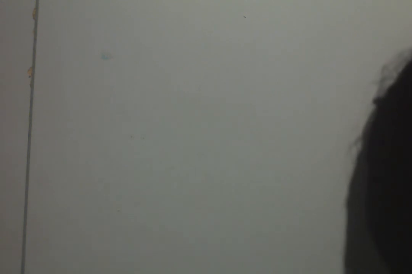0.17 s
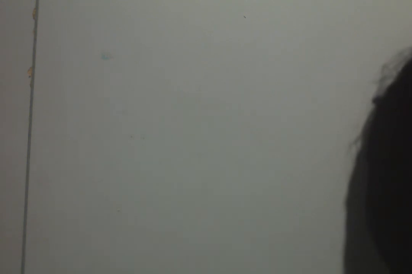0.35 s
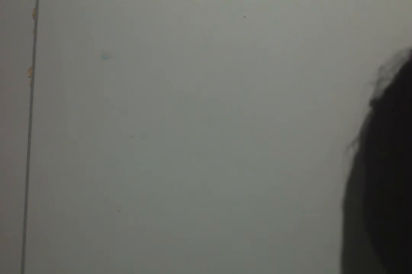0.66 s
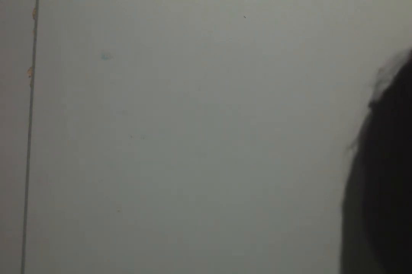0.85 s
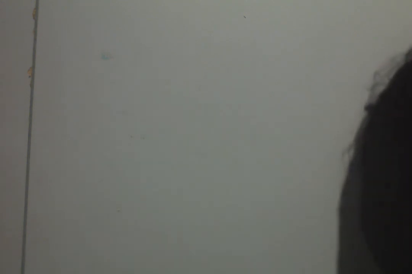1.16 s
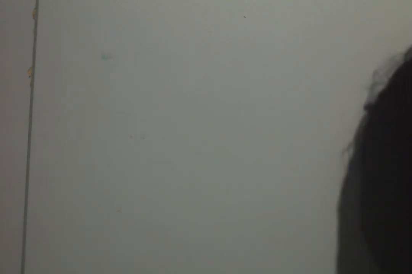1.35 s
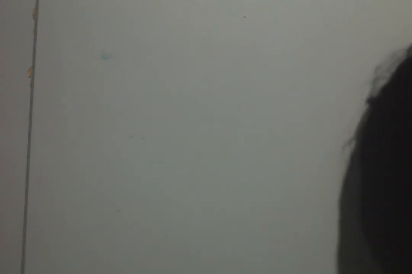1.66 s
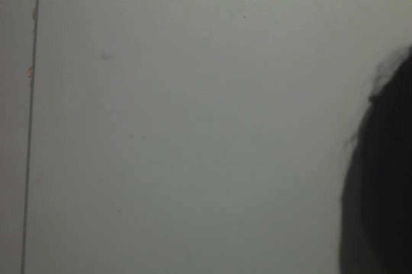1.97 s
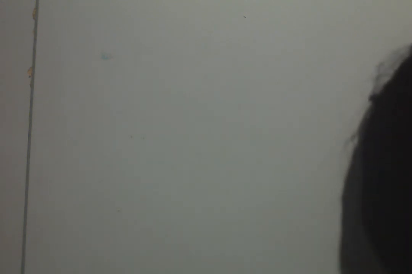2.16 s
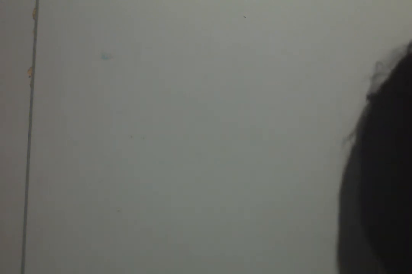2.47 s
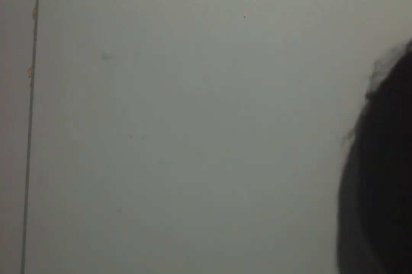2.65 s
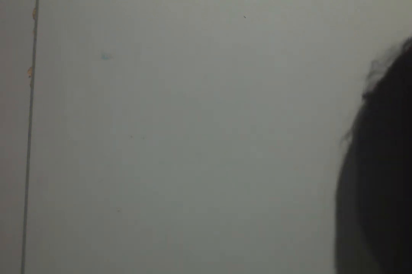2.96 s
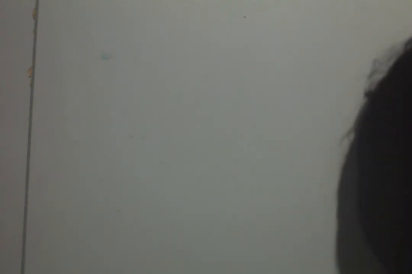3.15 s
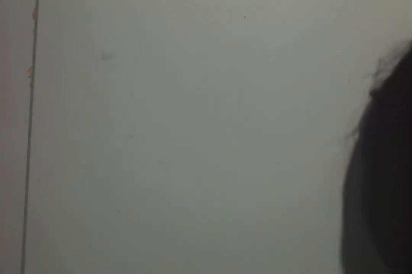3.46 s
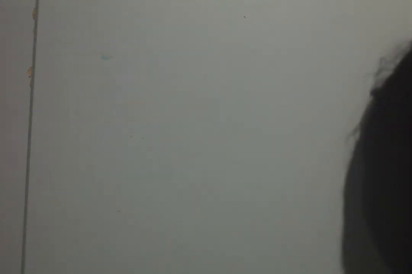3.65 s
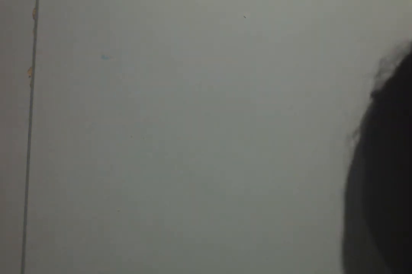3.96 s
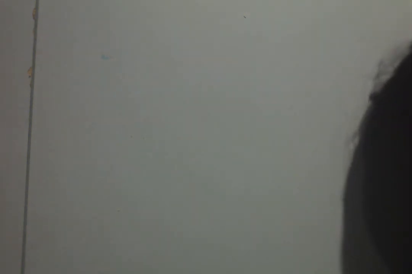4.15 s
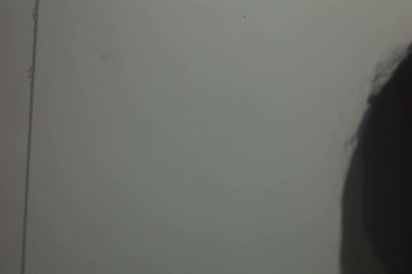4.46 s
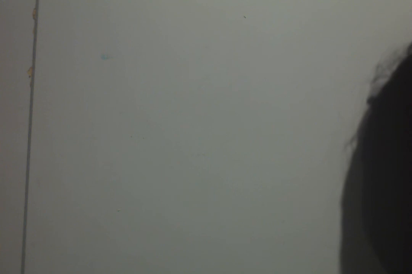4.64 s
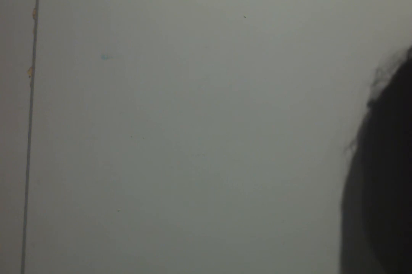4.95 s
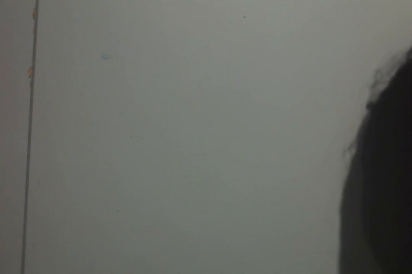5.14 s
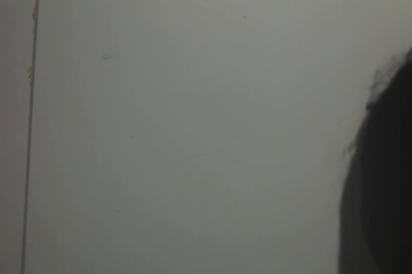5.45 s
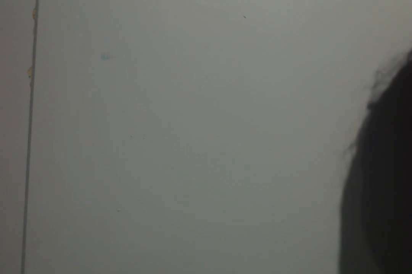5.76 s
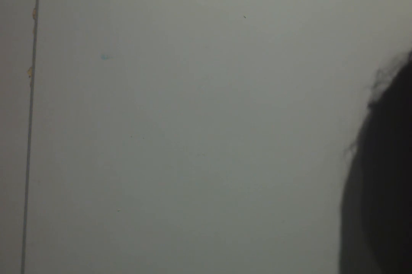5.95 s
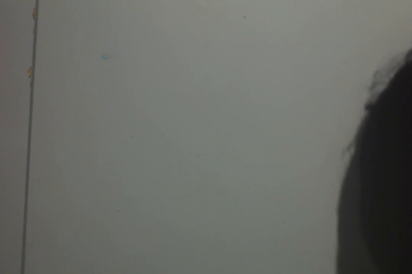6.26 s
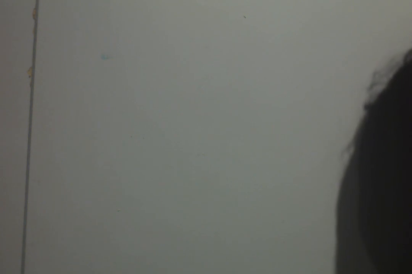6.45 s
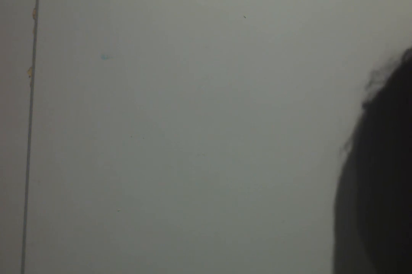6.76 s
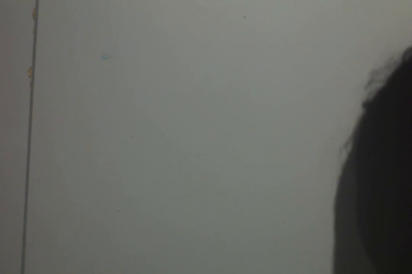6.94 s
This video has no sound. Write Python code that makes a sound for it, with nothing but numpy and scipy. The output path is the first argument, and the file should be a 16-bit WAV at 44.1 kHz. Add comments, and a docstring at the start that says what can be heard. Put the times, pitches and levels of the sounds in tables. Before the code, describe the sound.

A small room with a steady low ventilation hum, gently swelling, and very faint hiss; small hard plastic toy pieces are handled close to the microphone. Nearly quiet until 0.4 s, then a tight cluster of bright clicks at 0.58-0.67 s, with a hollow knock at 0.79. Short scraping slides follow, the strongest around 0.9-1.1 s, ending in a rattly click, then scrapes and small taps until 1.5. Firm snaps land at 1.62 and 1.76, small ticks clatter around 1.9-2.07, the loudest sharp snap comes at 2.23, a lighter click at 2.47 and another bright snap at 2.8. From 3 to 4.7 s there is mostly faint sleeve and finger rustle with tiny ticks. Light, clear pin taps come at 4.8-5.2, crisp clicks at 5.48 and, louder, 5.84, then faint ticks until 7 s. Each dry click leaves a short room tail.

```python
"""Ventilation rumble, thin hiss and faint rustle of sleeves and fingers lie under everything: coloured noise.
Over them small plastic pieces are snapped and knocked close by: micro-bounces ring plastic modes.
Slides between them are dense random slips through gliding resonators.
Later a loose pin taps a shell: micro-bounces ring a few clear modes.
The small room answers with scatter, two wall echoes and a tail."""
import sys
import numpy as np
from scipy import signal
from scipy.fft import irfft
from scipy.io import wavfile
from scipy.ndimage import uniform_filter1d

SR = 44100
rng = np.random.default_rng(int(sys.argv[2]) if len(sys.argv) > 2 else 0)


def dump(signal):
    """Clip the signal to [-1, 1] and save it as 16-bit WAV at the path in sys.argv[1]."""
    limited = np.clip(np.atleast_2d(signal).T, -1, 1)
    pcm = np.round(limited * 32767).astype(np.int16)
    wavfile.write(sys.argv[1], SR, pcm)


N = 312228


def amp(db):
    """Decibels to linear amplitude."""
    return 10 ** (np.asarray(db) / 20)


def evened(x):
    """Scales to unit RMS."""
    return x / np.sqrt(np.mean(x ** 2) + 1e-20)


def read(points, hz):
    """Interpolates a (Hz, value) curve over log frequency."""
    f, value = np.transpose(points)
    return np.interp(np.log(hz + 1), np.log(f + 1), value)


def add(mix, start_s, sound):
    """Adds a sound in place, cut at the end of the mix."""
    part = mix[round(start_s * SR):][:len(sound)]
    part += sound[:len(part)]


def level(rows):
    """Amplitude curve, straight in dB between points."""
    s, db = np.transpose(rows)
    return amp(np.interp(np.arange(N) / SR, s, db))


def noise(db_of, size, patchy_db):
    """Unit-RMS noise: random short-time spectra under a colour, with drifting patches."""
    hz = np.fft.rfftfreq(size, 1 / SR)
    real, imag, patches = rng.standard_normal((4 * N // size + 5, len(hz), 3)).T
    patches = uniform_filter1d(patches, size=9, axis=0)
    patches = evened(uniform_filter1d(patches, size=9, axis=1))
    spectra = (real + 1j * imag) * amp(db_of(hz)[:, None] + patchy_db * patches)
    return evened(signal.istft(spectra, nperseg=size, noverlap=3 * size // 4)[1][:N])


def stroke_db(t, length, rise, fall, quiet_db):
    """Attack, hold and release as straight ramps in dB; quiet_db at both ends."""
    to_start = 1 - t / max(rise, 1e-3)
    to_end = 1 - (length - t) / max(fall, 1e-3)
    return quiet_db * np.clip(np.maximum(to_start, to_end), 0, 1)


def causal(db):
    """The shortest causal (minimum-phase) pulse with a given colour."""
    log_gain = np.log(amp(np.maximum(db, -140)))
    circle = np.concatenate([log_gain, log_gain[-2:0:-1]])
    return irfft(np.exp(np.conj(signal.hilbert(circle))[:len(db)]))[:len(db)]


def resonate(x, hz, width_hz):
    """One-pole resonator on a moving pitch: shifts hz down to zero, smooths, shifts back."""
    turn = np.exp(2j * np.pi * np.cumsum(hz * np.ones(len(x))) / SR)
    r = np.exp(-np.pi * width_hz / SR)
    return 2 * (turn * signal.lfilter([1 - r], [1, -r], x / turn + 1e-18)).real


# ventilation level: (time [s], level [dB])
VENT_LEVEL = [(0.0, -55.5), (1.83, -51), (3.67, -57), (3.9, -53.5), (4.38, -58), (4.79, -53), (5.99, -55.5),
              (7.08, -61)]
# ventilation colour: (frequency [Hz], relative density [dB per Hz])
VENT_COLOUR = [(15, -83), (25, -53), (65, -32), (131, -1), (163, -15.5), (313, -23.5), (339, -31.5),
               (378, -24), (457, -37.5), (553, -32), (1090, -43), (1510, -43.5), (2900, -48.5),
               (10100, -60), (16500, -74)]
# duct and case resonances: (frequency [Hz], width [Hz], lift [dB])
VENT_MODES = [(128.8, 6.3, 2), (184.7, 13, 12), (234, 20, 8), (1530, 320, 7.5), (3423, 210, 10)]


def air():
    """Ventilation rumble swollen at a few duct and case resonances, a soft rush above."""
    def colour(hz):
        lift_db = sum(db / (1 + (2 * (hz - f) / w) ** 2) for f, w, db in VENT_MODES)
        return read(VENT_COLOUR, hz) + lift_db
    return level(VENT_LEVEL) * noise(colour, size=4096, patchy_db=2.5)


# electronics: (frequency [Hz], relative density [dB per Hz])
HISS_COLOUR = [(25, -110), (400, -31), (1000, -7.5), (2500, 1.5), (5000, 0), (8000, -12), (12000, -11.5),
               (16500, -25.5)]


def hiss(db):
    """Steady noise of the microphone electronics."""
    return amp(db) * noise(lambda hz: read(HISS_COLOUR, hz), size=1024, patchy_db=4.0)


# cloth and skin brushes: (start [s], length [s], level [dB])
BRUSHES = [(0, 0.27, -81), (0.552, 2.5, -81.5), (2.2, 0.34, -82), (2.885, 0.34, -78), (3.609, 0.26, -81),
           (3.795, .11, -82), (4.182, .22, -87), (4.469, 0.19, -81), (4.64, 0.51, -80.5),
           (5.054, 0.47, -81.5), (5.606, 0.16, -89.5), (5.856, 0.34, -83), (6.144, 0.19, -94)]
# cloth colour: (frequency [Hz], relative density [dB per Hz])
CLOTH_COLOUR = [(2940, -38.5), (5000, -8), (8360, -12.5), (10400, -8), (12100, -13), (15400, -18),
                (16500, -37)]
BRUSH_RISE, BRUSH_FALL = 0.26, 0.51  # shares of the length
BRUSH_DROP_DB, STILL_DB = -10.5, -97.5  # brush ends re hold; hands at rest


def rustle():
    """Faint hiss of sleeves and fingertips: cloth noise gated brush by brush."""
    gain = np.zeros(N)
    for start, length, db in BRUSHES:
        t = np.arange(0, length, 1 / SR)
        swell_db = stroke_db(t, length, BRUSH_RISE * length, BRUSH_FALL * length, BRUSH_DROP_DB)
        add(gain, start, amp(db + swell_db))
    return (gain + amp(STILL_DB)) * noise(lambda hz: read(CLOTH_COLOUR, hz), size=256, patchy_db=3.5)


def chatter(decay_ms, first):
    """A first contact, then a dying spray of micro-bounces."""
    u = np.arange(2049) / SR / (max(decay_ms, .1) / 1000)
    hits = (0.053 + rng.standard_normal(len(u))) * (rng.random(len(u)) < .4)
    bounces = hits * (0.56 + u) * np.exp(-u ** 1.117)
    bounces[12] = first
    return bounces


# blows, colours re the band near 5 kHz: (time [s], strength [dB], thud [dB], clack [dB], snap [dB],
#   sizzle [dB], low ring [Hz], high ring [Hz], chatter [ms])
KNOCKS = [(0.041, -51, 10, 12, 10, 15, 3900, 12400, 1.6), (0.436, -36, -10.5, -6, 4, 8, 4270, 14700, 1.8),
          (0.452, -38.5, -17, -21, -9, -1.5, 1460, 3400, 1.8),
          (0.5842, -14, -23, 4, 11, 8, 2050, 7200, 1.2), (0.5888, -26.5, -25, 0, -4, -0.5, 1510, 4600, 1.4),
          (0.596, -32, -18, -12, 10, 4, 1500, 4480, 1.5), (0.6032, -10, -7, 3.5, 13, 9, 2070, 4300, 1.8),
          (0.621, -21.5, -26, -13, 5, 4, 4000, 9000, 2), (0.6392, -29.5, -28, -3, 2, -4, 3700, 6240, 1.2),
          (0.6455, -37, -28, -7, 4, -7, 3700, 6500, 1.2), (0.6524, -32, -28, -6, 2, -6, 3600, 6000, 1.7),
          (0.6656, -16, 3.5, 9.5, -9, -17, 1900, 3550, 2.26),
          (0.758, -38.5, -10, 4, -20, -8.5, 1660, 4660, 2), (0.7755, -46, -19, -9, -17, -19, 2000, 4020, 1),
          (0.7843, -30.5, -7, -10, -17, -19, 1960, 3850, 2), (0.791, -19.5, 10, 14, 3, -9, 608, 1470, 3.9),
          (1.08, -22.5, -10, 10, 6, 6, 8200, 10700, 5), (1.0947, -20.5, -1, 7, -26, -13, 2050, 3100, 6.1),
          (1.2005, -31.5, 10, -7, -15, -38, 2200, 2980, 4.3),
          (1.2115, -34.5, 2, 7, -17, -30, 2200, 2800, 1.4), (1.294, -38, -17, 0, -14, -20, 2920, 2800, 1.9),
          (1.319, -28, -8, -4, -11, -23, 2200, 3350, 4.2),
          (1.3373, -23.5, -5.5, -2, -8.5, -33, 1260, 2200, 5.6),
          (1.357, -32, 16, 13, 0, -23, 2100, 3535, 1.3), (1.3965, -47, -5, 5, -12, -19, 2100, 3300, 1.3),
          (1.45, -32.5, 3, -14, -4, -17, 2150, 3480, 6.8),
          (1.5126, -31.5, 14, 13, -1, -7.5, 2250, 3450, 2.8),
          (1.522, -38, -8, 10, -8, -8, 2250, 3500, 0.84),
          (1.5275, -38.5, -15, -16, -4, -6, 2200, 7800, 0.99),
          (1.6163, -12.5, -0.5, 8, 8.5, 3, 408, 7480, 1.46),
          (1.7582, -16, -6, -7.5, -24, -24.5, 1410, 2260, 1.77),
          (1.7697, -23, 6, 5.5, -8, -23, 2200, 3600, 1.5), (1.847, -41.5, -8, -8, 7, -22, 6500, 7600, 1.2),
          (1.921, -30, 3, 4, -7, 9, 2200, 12380, 3.2), (1.949, -35, -14, -3, -8, 5, 3500, 7000, 1.5),
          (1.9567, -26, -18, -15, 12, -6, 6000, 7600, 2.3),
          (1.9772, -27, 3.5, 6.5, 5.5, 4, 3180, 3530, 1.7), (1.991, -43, -10, -8, 2, -5, 3300, 7200, 1.5),
          (2.0127, -36, -9, -11, 7, -5, 3480, 6100, 1.3), (2.0185, -46, -15, -15, 1, -3, 5800, 6500, 1),
          (2.0275, -36.5, -13, -5, 3, 0, 3700, 6300, 1.6), (2.069, -34, 1, 6.5, 1.5, 3, 893, 9200, 1.6),
          (2.2287, -11.5, -20, 3, -5, 7, 5400, 9260, 1.0), (2.2301, -3.5, -9, 1, 9, 11.5, 2350, 9200, 0.81),
          (2.2861, -43, -7, 0, 9, 2, 3140, 9200, 1.5), (2.372, -52.5, 5, -14, -11, -20, 1426, 4230, 0.74),
          (2.4739, -25, -9, 1, 4, 0, 6040, 9460, 1), (2.527, -50, 5, 2, 6, -13, 2990, 9690, 1.8),
          (2.5644, -45.5, -1, 10, 16, 2, 3270, 9600, 1.4),
          (2.8013, -11.5, -19.5, -5.5, 20, 13, 3750, 9550, 1.32),
          (2.831, -42, 1, 0, -8, -7, 5730, 10900, 2.4), (2.969, -34.5, 6, 4, 10, 6, 5270, 9150, 1.9),
          (3.675, -44, 16, 1, 19, 27, 5600, 12150, 3.3),
          (3.8487, -54, 15.5, 5.5, 5.5, 4.5, 5750, 11450, 2.6),
          (3.9297, -50.5, 8, -4, -20, -19, 1014, 3960, 1),
          (4.5177, -48, -8.5, -6, 2.5, 0, 3900, 10330, 1.2),
          (5.4787, -22, -36.5, -5.5, 6, -3, 3920, 5900, 1.64),
          (5.789, -58, -3.5, -17, -14, -16.5, 2910, 3500, 1.7),
          (5.8357, -11, -54.5, -9.5, 5.5, 7, 5440, 10200, 1.37),
          (6.3774, -60.5, -3.5, 3, -10.5, -5.5, 1375, 2250, 1.1),
          (6.4123, -53, -7, -6, -6, -22, 3080, 3680, 3.1),
          (6.4198, -51, -3, -10, -2, -30, 3160, 3700, 1.16),
          (6.5951, -58.5, -5, -2, -5, -7, 2730, 3300, 1.15),
          (6.6587, -36.5, -35, -8, -9.5, -16, 2880, 3570, 1.5),
          (6.7, -54.5, 0, -1, -21, -20.5, 2900, 3500, 2.1),
          (6.863, -61, -5.5, -3.5, -13, -7, 3000, 3870, 1.1),
          (7.055, -50, -7.5, -7.5, -1.5, -15.5, 3220, 3790, 1.7)]
# rings of the pieces, for knocks and slides: (nominal frequency [Hz], relative level [dB], t60 [s])
PLASTIC_MODES = [(428, 3, 0.02), (607, -4, 0.027), (800, 2.5, 0.033), (1220, -6, 0.084), (1520, 4.5, 0.051),
                 (2050, 1.5, 0.025), (2200, -2, 0.053), (2970, -4, .015), (3620, 2, 0.0067),
                 (3870, -5, 0.0071), (4660, 0, 0.022), (5240, 1, 0.012), (6450, 0.5, 0.013),
                 (7200, 1.5, 0.0063), (7710, -9, .008), (9000, 0.5, 0.0081), (9800, 1.5, .01),
                 (10900, 2, 0.0046), (11710, -0.5, 0.0057), (13640, 2.5, 0.0051), (13580, -6, .007),
                 (14930, -5, 0.0044)]
THUD_HZ, GAP_HZ, CLACK_HZ, TICK_HZ, SNAP_HZ, SIZZLE_HZ = 500, 1000, 2100, 5000, 9500, 13500
GAP_DB = -4  # weak between thud and clack
# low rings under HOLLOW_HZ come from the hollow of a piece: longer by a factor, and louder
HOLLOW_HZ, HOLLOW_STRETCH, HOLLOW_DB = 1000, 2.8, 23


def knock(strength_db, thud_db, clack_db, snap_db, sizzle_db, low_hz, high_hz, chatter_ms):
    """Micro-bounces ring the modes; returns sound towards the microphone and mean over directions."""
    f, t = np.fft.rfftfreq(4096, 1 / SR), np.arange(2049) / SR
    hz, db, t60 = np.transpose(PLASTIC_MODES)[:, :, None]

    def lorentz(centre, t60):
        return 1 / (1 + (2 * (f - centre) * t60 / 3.4) ** 2)

    luck = rng.standard_normal((len(hz), 2))
    mode_power = amp(2 * db + 1.9 * luck[:, :1])
    modes = (mode_power * lorentz(hz * (1 + 0.034 * luck[:, 1:]), t60)).sum(0)
    # the struck spot rings most
    hollow = low_hz < HOLLOW_HZ
    low_t60 = 0.013 * (1500 / low_hz) ** .6 * (HOLLOW_STRETCH if hollow else 1)
    modes += amp(18.5 + HOLLOW_DB * hollow) * lorentz(low_hz, low_t60)
    modes += amp(21.5) * lorentz(high_hz, 0.0076)

    gap_db = (thud_db + clack_db) / 2 + GAP_DB
    colour_db = read([(THUD_HZ, thud_db), (GAP_HZ, gap_db), (CLACK_HZ, clack_db), (TICK_HZ, 0),
                      (SNAP_HZ, snap_db), (SIZZLE_HZ, sizzle_db)], f)
    colour_db -= 40 * np.log10(1 + (250 / (f + 1)) ** 2)  # small pieces radiate no bass
    first = 3.5 * min(1, 1.07 / chatter_ms) ** 1.3  # long chatter starts softly
    pulse = causal(colour_db + 10 * np.log10(modes + 0.088))
    sound = signal.fftconvolve(chatter(chatter_ms, first), pulse)[:len(t)]
    spread = causal(colour_db + 2.0 * np.log10(modes + 0.19))  # smoother
    size = 2.534 * amp(strength_db)
    return size * sound / np.linalg.norm(sound), size * spread / np.linalg.norm(spread)


# tail decay: (frequency [Hz], t60 [s])
ROOM_T60 = [(500, .3), (2600, 0.31), (7000, 0.25), (11000, 0.17), (15000, 0.12)]
# first echoes: (delay [ms], level [dB])
WALL_ECHOES = [(8.5, -25), (13, -37.5)]


def room(x, near_db, near_t60, tail_db):
    """Scatter off table and hands, two wall echoes, a tail whose bands die at their own speed."""
    taps = np.zeros(SR // 2)
    at = np.arange(250, len(taps) - 12, 12)
    taps[at + rng.integers(0, 12, len(at))] = rng.choice([-1., 1.], len(at))
    near = taps * amp(-60 * np.arange(len(taps)) / SR / near_t60)
    far_taps = np.roll(taps, 7) * rng.choice([-1., 1.], len(taps))
    hz, t, z = signal.stft(far_taps, SR, nperseg=128)
    decay = amp(-60 * t / read(ROOM_T60, hz)[:, None])
    tail = signal.istft(z * decay, SR, nperseg=128)[1][:len(taps)]
    response = amp(tail_db) * tail / np.linalg.norm(tail)
    response += amp(near_db) * near / np.linalg.norm(near)
    for ms, db in WALL_ECHOES:
        add(response, ms / 1000, amp([db]))
    return signal.fftconvolve(x, response)[:N]


# strokes: (start [s], full from [s], easing from [s], end [s], shell [dB],
#   palm, rim, wall, studs, edges [dB re shell], palm ring [Hz],
#   shell start, shell end, rim start, rim end, wall start, wall end [nominal Hz], judder [dB])
SLIDES = [(0.424, 0.436, 0.45, 0.45, -83.5, -6, 6, 18, 19, 18, 464, 1510, 1520, 2260, 2270, 4200, 3900, 3.3),
          (0.663, 0.675, 0.69, 0.74, -45.5, -8, -5, -11, -18, -20, 532, 1435, 1250, 1990, 1960, 3250, 3250, 2.5),
          (0.738, 0.75, 0.8, 0.86, -51.5, -12, -2, -10, -13, -20, 600, 1585, 1440, 2030, 1870, 4000, 3580, 4.8),
          (0.877, 0.978, 1.044, 1.109, -44.5, -20, -13, -8, -11.5, -5, 1000, 1435, 1646, 1890, 2160, 4100, 3540, .8),
          (1.089, 1.092, 1.166, 1.183, -52.5, -2.5, 1.5, 1, -8.5, -15, 480, 1427, 1300, 2070, 2350, 3000, 3180, 2.3),
          (1.178, 1.19, 1.155, 1.26, -52, -0.5, -3.5, -6, -10, -35, 516, 1270, 1310, 2200, 2320, 3380, 3200, 3),
          (1.26, 1.328, 1.32, 1.414, -52, -19, 1.5, -1.5, -6.5, -11, 666, 1273, 1380, 2190, 2120, 2860, 3620, 2.8),
          (1.385, 1.4, 1.505, 1.5, -61, -5, 6, 1, -7.5, -15, 606, 1400, 1240, 2030, 2250, 3500, 3560, 2),
          (1.839, 1.86, 1.885, 1.917, -60.5, -12, -3, 0.5, -19, -13, 463, 1240, 1220, 2080, 2110, 3020, 3060, 2.3),
          (1.906, 1.922, 1.945, 2.03, -64.5, -23, 2, 9.5, 4, 7, 548, 1520, 1480, 2100, 2000, 3510, 3520, 2.7),
          (2.015, 2.035, 2.053, 2.07, -80, 9, 8, 11, 23.5, 21.5, 860, 1530, 1650, 2100, 2300, 3560, 3960, 2.7),
          (2.999, 3.061, 3.02, 3.22, -86.5, 10, -2, 11, 18, -2, 479, 1500, 1460, 2080, 2000, 4200, 3800, 3)]
# finger pressure, end values held outside: (time [s], level [dB])
PRESSURE = [(0.93, -5), (0.952, 6.5), (0.966, -4.5), (0.98, 1), (0.995, -1), (1.02, 2.5), (1.034, 0.5),
            (1.047, -7), (1.054, -5), (1.058, 5), (1.064, 8), (1.07, 6), (1.079, 6), (1.085, 20.5),
            (1.092, 9.5), (1.1, 3.5), (1.114, -0.5), (1.126, 6), (1.132, -0.5), (1.148, 6.5), (1.17, 1),
            (1.29, 2.5), (1.314, -8), (1.323, -2), (1.33, 2), (1.34, 1.5), (1.354, -1.5), (1.4, -1),
            (1.42, -4.5), (1.43, 5), (1.44, 1), (1.455, 6.5), (1.47, -1), (1.5, 2)]
# bands of palm, shell, rim, wall, studs, edges: (from [Hz], to [Hz])
PART_BANDS = [(0, 1000), (1000, 1750), (1750, 2600), (2600, 5900), (5900, 8500), (8500, 13000)]
QUIET_DB = -21.5  # stroke ends re hold
THIN_PRESS = .4  # share of pressure dB followed by wall, studs and edges
BEND = .6  # exponent: modes follow the shell glide as the grip shifts
LATE, WANDER, GRIT_DB = 2.1, 0.016, 2.5  # glide power; rim and wall drift share; slip size spread


def slide(start, full, easing, end, shell_db, palm_db, rim_db, wall_db, studs_db, edges_db, palm_hz,
          *rest):
    """Dense uneven slips ring flickering modes; palm, shell, rim and wall each sing, the last three glide."""
    *glides, judder_db = rest
    length, rise, fall = end - start, full - start, end - easing
    t = np.arange(0, length, 1 / SR)

    def chance(size):
        return evened(uniform_filter1d(rng.standard_normal(len(t)), size))

    def glide(a, b):
        return a + (b - a) * (t / length) ** LATE

    shell_hz, rim_hz, wall_hz = (glide(a, b) for a, b in np.reshape(glides, (-1, 2)))
    rim_hz, wall_hz = (hz * (1 + WANDER * chance(size=900)) for hz in (rim_hz, wall_hz))

    grit_db = GRIT_DB * np.minimum(rng.exponential(size=len(t)), 4.5)
    slip_db = judder_db * chance(size=110) + 1.6 * chance(size=60) + grit_db
    slips = amp(slip_db) * rng.standard_normal(len(t)) * (rng.random(len(t)) < .6)

    def ring(hz, width_hz):
        return evened(resonate(resonate(slips, hz, width_hz), hz, 2 * width_hz))

    bend = (shell_hz / shell_hz.mean()) ** BEND
    rings = []
    for hz, db, t60 in PLASTIC_MODES:
        catch_db = db - 1.4 * np.log2(hz / 1000) + 2.1 * chance(size=1500)
        rings.append((hz, amp(catch_db) * ring(hz * bend, 5.2 / t60)))

    bodies = []
    for lo, hi in PART_BANDS:
        body = evened(sum(r for hz, r in rings if lo < hz < hi))
        top = min(hi, 13000)
        rasp = 0.14 * ring(np.sqrt(max(lo, 400) * top), .6 * (top - lo))  # fills between modes
        bodies.append(evened(body + rasp))

    press_db = np.interp(start + t, *np.transpose(PRESSURE))
    mix = (amp(studs_db) * bodies[-2] + amp(edges_db) * bodies[-1]) * amp(THIN_PRESS * press_db)
    # level dB, ring Hz, ring share, ring width Hz, pressure share
    voices = [(palm_db, palm_hz, 1.2, 54, .9), (0, shell_hz, 1.3, 90.7, 1.0),
              (rim_db, rim_hz, 1.3, 169, .9), (wall_db, wall_hz, 0.45, 170.0, THIN_PRESS)]
    for body, (db, hz, share, width_hz, follow) in zip(bodies, voices):
        mix += amp(db + follow * press_db) * evened(body + share * ring(hz, width_hz))
    gain = amp(shell_db + stroke_db(t, length, rise, fall, QUIET_DB))
    return mix * gain * signal.windows.tukey(len(t), .04)


# loose pin on the shell: (time [s], strength [dB], chatter [ms], treble tilt [dB per octave],
#   nominal main ring [Hz])
PIN_TICKS = [(4.812, -38, 1.3, 4.5, 5400), (4.9512, -52.5, 1.6, -9, 4760), (5.082, -35, 2.3, 0, 5420),
             (5.2245, -40, 2.0, -0.5, 5240)]
# pin rings: (nominal frequency [Hz], relative level [dB], t60 before damping [s])
PIN_MODES = [(3830, -12, 0.024), (7120, -0.5, 0.021), (8970, -6, 0.038), (9700, -1.5, 0.025),
             (10820, 2.5, 0.024), (11760, -4, 0.022), (12600, -3.5, 0.028), (14400, -8, .02),
             (15300, -10, .015)]
MAIN_DB, MAIN_T60_S = 7, .015  # main ring, before tilt and damping
DAMPED = 0.85  # t60 factor: fingers shorten the rings
SNAP = 3.1  # bare thin click beside the ring


def pin_tick(strength_db, chatter_ms, tilt_db, main_hz):
    """Micro-bounces ring the pin's few clear modes, a little shifted at each tap."""
    t = np.arange(2049) / SR
    hz, db, t60 = np.transpose(PIN_MODES + [(main_hz, MAIN_DB, MAIN_T60_S)])[:, :, None]
    luck = rng.standard_normal((len(hz), 2))
    ring_db = db + tilt_db * np.log2(hz / 7000) + 1.7 * luck[:, :1] - 60 * t / (DAMPED * t60)
    rings = amp(ring_db) * np.sin(2 * np.pi * hz * (1 + .012 * luck[:, 1:]) * t)
    click = SNAP * np.diff(t == 0, n=2, prepend=[0, 0])
    sound = signal.fftconvolve(chatter(chatter_ms, 3.5), rings.sum(0) + click)[:len(t)]
    return 2.4 * amp(strength_db) * sound / np.linalg.norm(sound)


def scene():
    """Knocks, slides and pin ticks, direct and through the room, over rustle, air and hiss."""
    toy, spread = np.zeros((2, N))
    for s, *row in KNOCKS:
        near, around = knock(*row)
        add(toy, s, near)
        add(spread, s, around)
    for row in SLIDES:
        sound = slide(*row)
        add(toy, row[0], sound)
        add(spread, row[0], sound)
    for s, *row in PIN_TICKS:
        tick = pin_tick(*row)
        add(toy, s, tick)
        add(spread, s, tick)
    echoes = room(spread, near_db=-14.0, near_t60=0.07, tail_db=-23.0)
    return (toy + echoes + rustle() + air() + hiss(-92.5))[None]


# microphone response: (frequency [Hz], gain [dB])
MIC_RESPONSE = [(60, 3.5), (150, 3.5), (12000, 0), (14500, -2), (15700, -7.5), (16500, -21.5)]
EDGE_HZ = 16700


def record(dry):
    """A small microphone's response, then a steep low-pass at the band edge."""
    mic = causal(read(MIC_RESPONSE, np.fft.rfftfreq(4096, 1 / SR)))
    heard = signal.oaconvolve(dry, mic[None])[:, :N]
    low_pass = signal.firwin(511, EDGE_HZ, window=("kaiser", 9), fs=SR)
    return signal.oaconvolve(heard, low_pass[None], "same")


dry = scene()
out = record(dry)
dump(out)
```